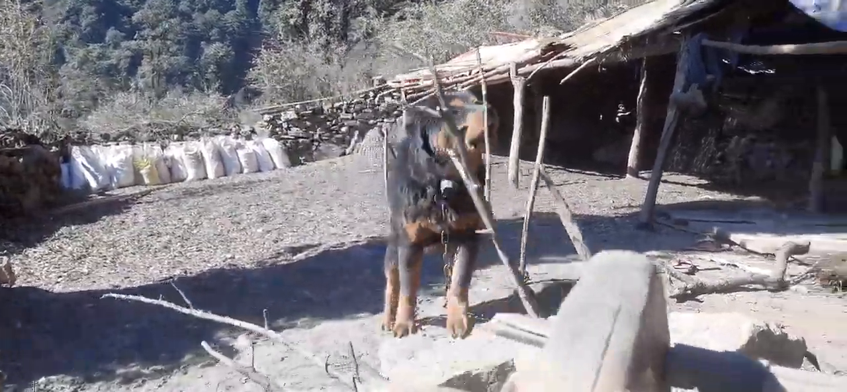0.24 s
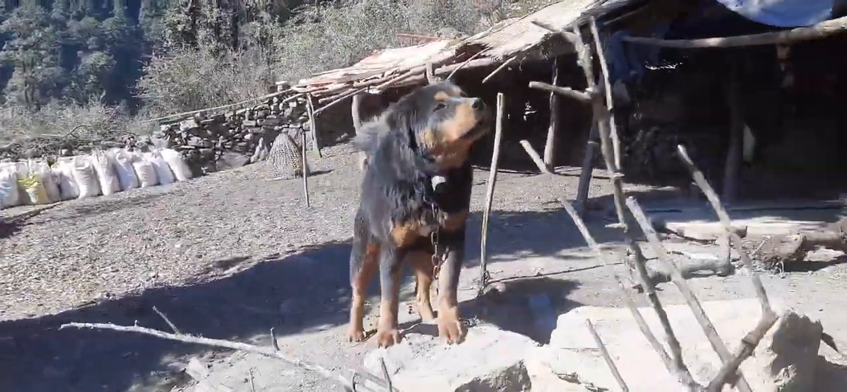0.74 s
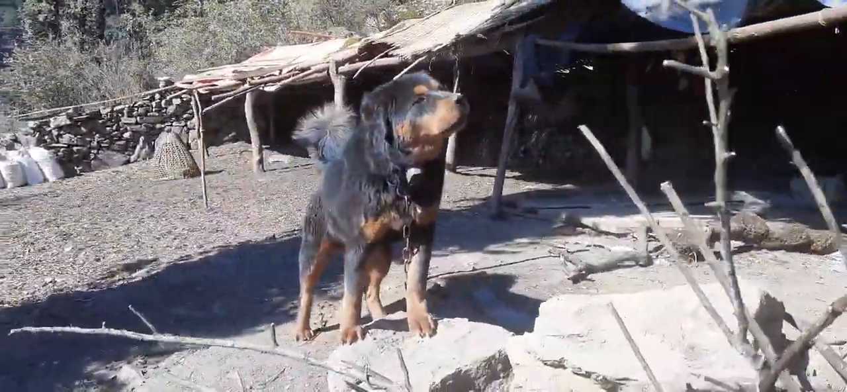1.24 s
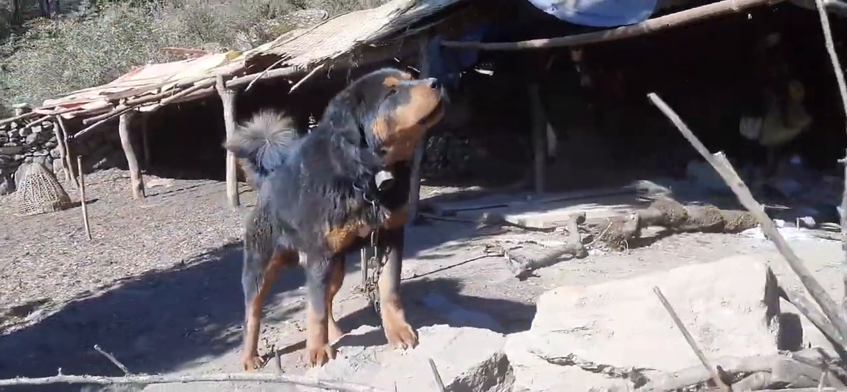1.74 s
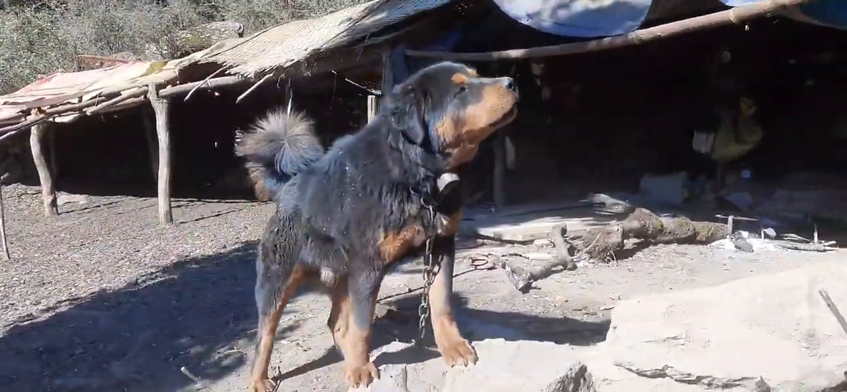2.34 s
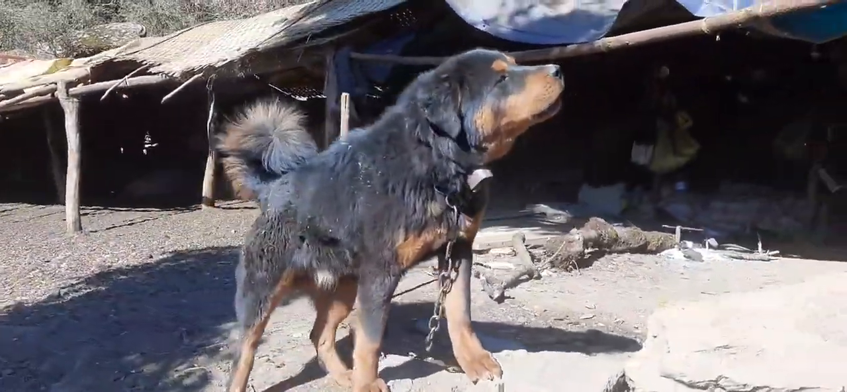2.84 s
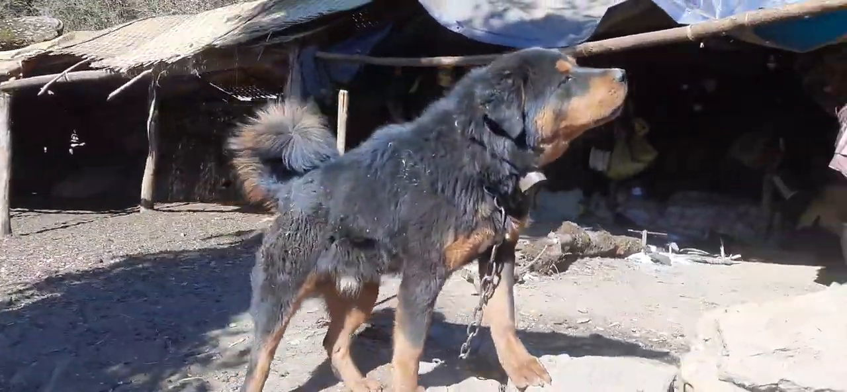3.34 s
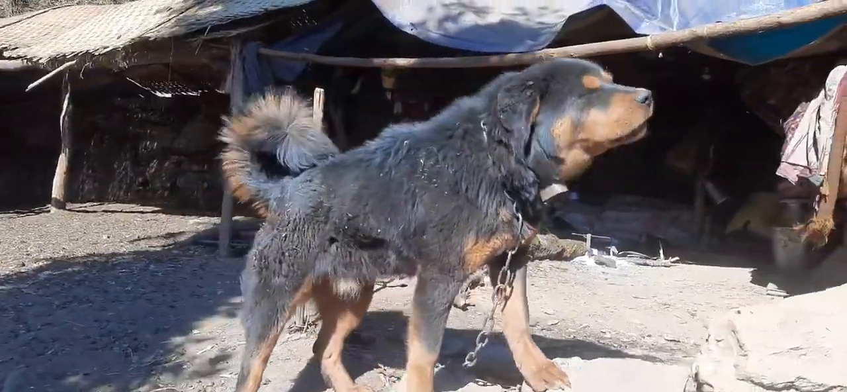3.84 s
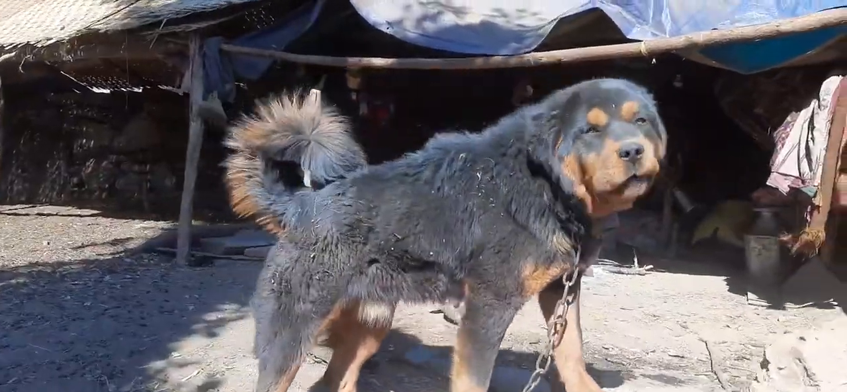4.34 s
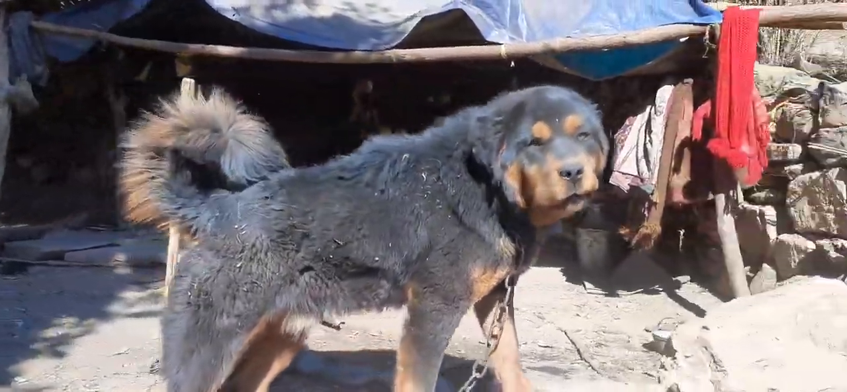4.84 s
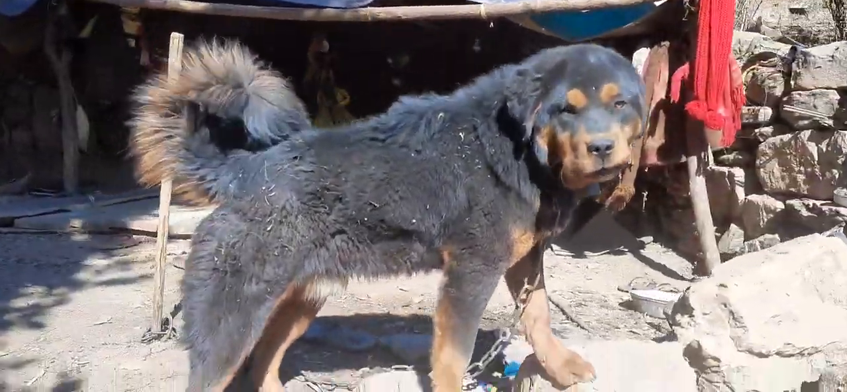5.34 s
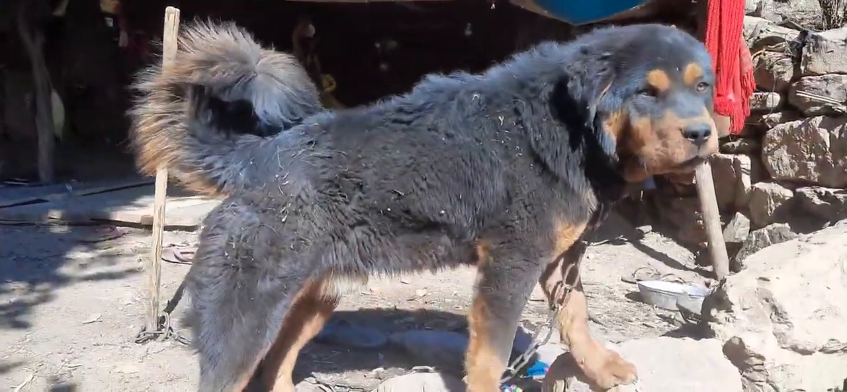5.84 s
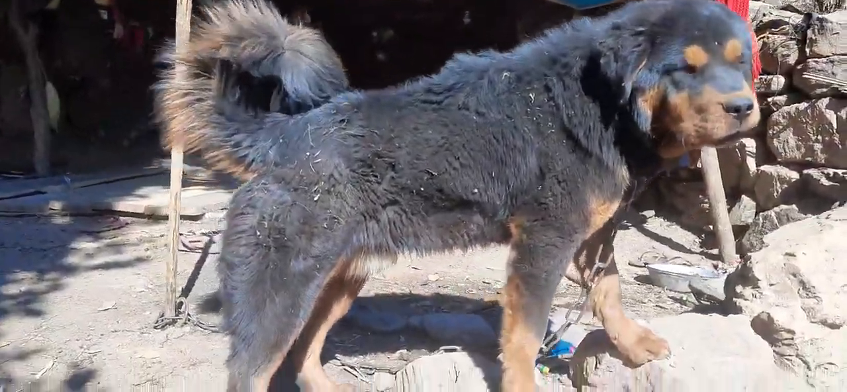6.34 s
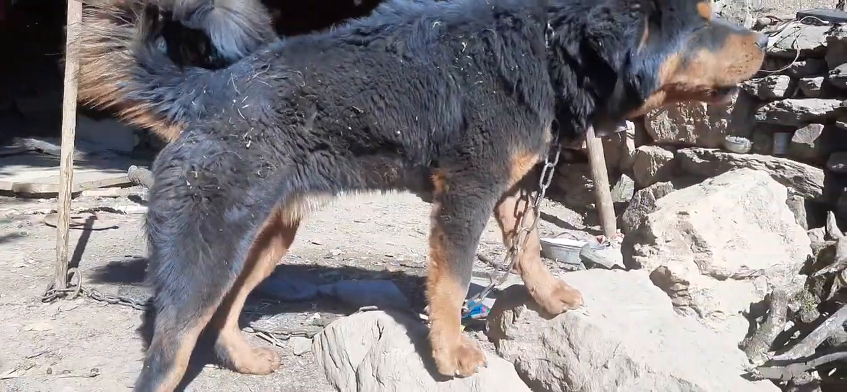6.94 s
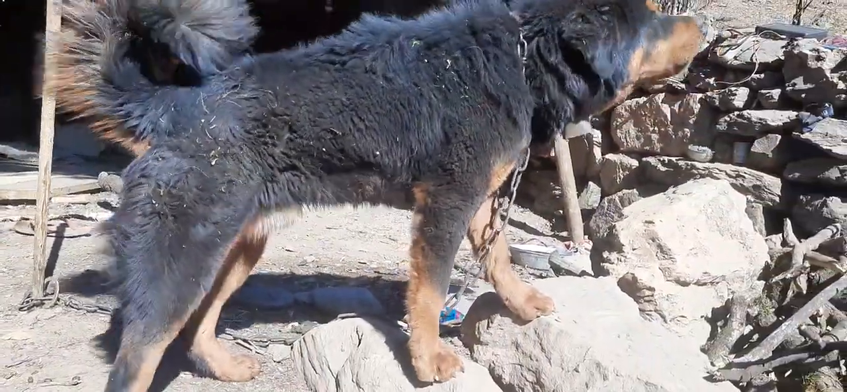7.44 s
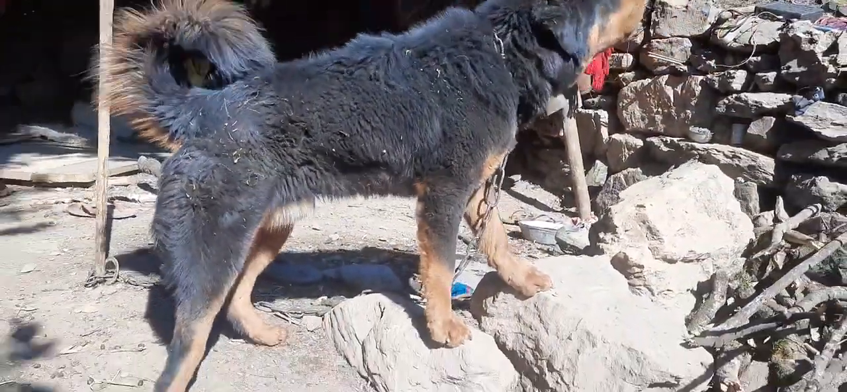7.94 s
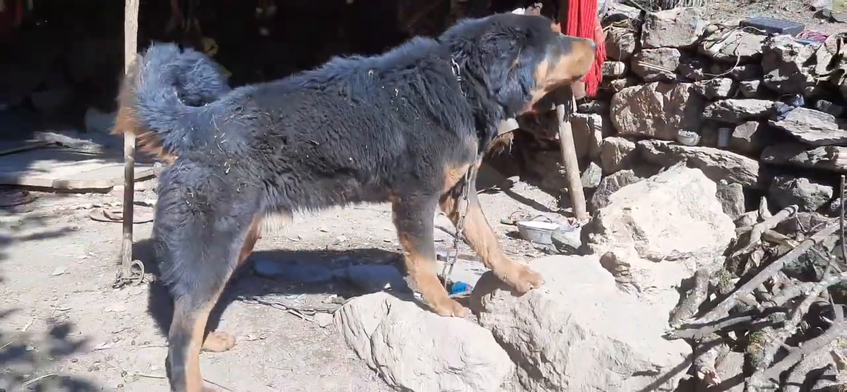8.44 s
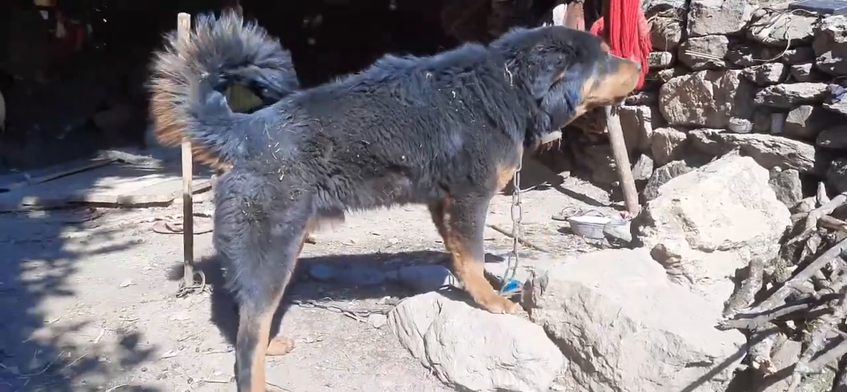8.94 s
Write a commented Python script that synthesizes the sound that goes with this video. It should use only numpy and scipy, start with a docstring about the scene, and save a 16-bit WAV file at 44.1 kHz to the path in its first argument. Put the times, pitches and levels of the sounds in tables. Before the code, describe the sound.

A big chained dog close by gives loud, hoarse, throaty barks, first a pair, then several spaced ones, some trailing into low creaky growls. Its small collar bell clinks with the movements. Between barks come soft panting and faint ticks of grit. A distant dog answers. Around the middle the barking stops and wind buffets the microphone in dull thumps, then a quick new run of barks follows. Open yard with short echoes off stone walls, stereo handheld microphone.

```python
"""A big chained dog barks in a mountain yard: each bark is a hoarse, throbbing pair of oscillators with two bands above,
and some end in slow creaky pulses that ring the throat. The collar bell and a piece of chain ring as decaying modes.
Shaped noise makes the panting, scuffs, ticks and wind on the two microphone ports; a short faint tone glides upward.
A second dog answers from afar in the same kind of voice, and walls echo the dogs and bell.
The background rustle rises with each bark and fades over a second or two."""
import sys
import numpy as np
from scipy import signal
from scipy.fft import rfft, irfft, next_fast_len
from scipy.io import wavfile
from scipy.ndimage import uniform_filter1d, minimum_filter1d, map_coordinates

SR = 44100
rng = np.random.default_rng(int(sys.argv[2]) if len(sys.argv) > 2 else 0)


def inscribe(sig):
    """Save sig as 16-bit PCM at rate SR to the path in sys.argv[1].

    A 1-D sig is mono; a 2-D sig holds one channel per row.
    Samples are clipped to [-1, 1] before scaling.
    """
    pcm = np.round(np.clip(np.atleast_2d(sig).T, -1, 1) * 32767)
    wavfile.write(sys.argv[1], SR, pcm.astype(np.int16))


N = 405719

# Table levels are relative; the functions add their own offsets, scatter and fluctuation.

# The near dog, one curve a bark: time_s, effort_db, pitch_hz, second_over_first_db, second_hz, sum_tone_over_first_db
BARK_CURVES = [
    [(0.0, -6.5, 418.5, -1.5, 729, -9.5), (0.028, -7, 410.6, -27, 721.1, -16.5),
     (0.058, -16, 404, -7, 699, -8.5), (0.086, -29, 405.7, -26, 681.7, -20),
     (0.13, -43, 406, -16.5, 755, -16)],
    [(0.325, -33, 410.6, -24, 819.2, -16.5), (0.333, -26, 411.6, -14, 823.4, -21),
     (0.355, -7, 414.9, -16.5, 811, -16.5), (0.403, -3.5, 399, -15, 742.1, -13.5),
     (0.449, -14.5, 399.4, -5, 722, -10), (0.481, -29.5, 390.1, -16, 737.5, -18.5),
     (0.53, -41, 386.1, -16, 762.3, -18)],
    [(1.54, -30, 393, -22, 776.6, -24), (1.564, -13.5, 393.6, -7.5, 815.3, -12.5),
     (1.586, -9, 398.8, -5.5, 802.8, -9), (1.616, -5.5, 407.7, -11, 795, -14.5),
     (1.656, -10.5, 405.2, -4, 820.3, -14), (1.682, -16, 398.2, -9, 832.8, -30.5),
     (1.706, -31, 393.6, -9, 840.2, -15.5), (1.76, -41.5, 420, -21, 815.5, -13)],
    [(1.93, -43, 393.3, -19, 807, -18.5), (1.958, -25.5, 397.1, -27, 805.9, -30),
     (1.976, -7, 400.9, -13, 789.1, -19), (2.024, -7.5, 417.6, -13, 764.1, -7),
     (2.064, -20.5, 416.3, -2.5, 714.7, -11), (2.084, -15, 408.2, -24.5, 688.6, -17),
     (2.14, -40.5, 413.6, 4, 822.8, -15), (2.182, -36, 406.2, -4.5, 762.5, -29),
     (2.2, -45, 396, -5, 789.6, -20.5)],
    [(2.555, -37.5, 409, -12, 837.5, -13.5), (2.573, -25, 410.8, -16.5, 836.5, -35),
     (2.593, -10, 415.7, -10, 801.9, -15.5), (2.637, -13.5, 423.5, -4, 734, -8.5),
     (2.657, -9, 431.7, -20, 758.3, -12), (2.685, -9, 428.9, -13, 812.8, -22),
     (2.703, -13.5, 429.4, -25, 791.3, -28), (2.735, -33, 433.9, -3.5, 724.5, -21),
     (2.775, -36.5, 412.4, -19, 743.4, -25), (2.79, -49, 407.7, -3, 763.7, -12)],
    [(3.55, -40.5, 418.1, -15, 813, -17.5), (3.576, -16, 424.3, -20, 819, -20),
     (3.596, -8, 435.3, -14, 835.5, -15), (3.63, -13, 432.3, -3, 807, -10),
     (3.658, -22, 430.1, 9, 752, 0.5), (3.696, -16, 442, -18.5, 732.6, -12),
     (3.77, -47.5, 430, -5.5, 736, -5.5)],
    [(6.885, -34, 425.7, -13, 883, -18.5), (6.911, -13.5, 434.5, -10.5, 872.4, -21),
     (6.935, -6, 445.4, -13.5, 861, -15.5), (6.965, -9.5, 451, -10.5, 791, -14),
     (6.997, -20, 434.6, 3.5, 747, -2.5), (7.047, -25.5, 436.1, -17, 751.2, -14.5),
     (7.11, -48.5, 451.8, -9, 1002, -1.5)],
    [(7.22, -28, 410.8, -25, 855, -29), (7.228, -23.5, 409.4, -12.5, 855.4, -15.5),
     (7.254, -10, 404.9, -11.5, 842.5, -12.5), (7.306, -10.5, 417.8, -2, 840.6, -7.5),
     (7.332, -19.5, 414.4, 2, 796.4, -6.5), (7.356, -16.5, 425, -8.5, 782.5, -12.5),
     (7.388, -24, 431.9, -22.5, 788.6, -22.5), (7.43, -55, 417.2, 2, 755, -8)],
    [(7.51, -50.5, 384, -6.5, 808, -3.5), (7.53, -28, 392.8, -15, 792.4, -20),
     (7.544, -13, 395.5, -9.5, 805.8, -21), (7.574, -6, 413.4, -10.5, 778.7, -13.5),
     (7.598, -11, 411.4, -1.5, 766.4, -5.5), (7.658, -14, 428.2, -12, 745, -16.5),
     (7.682, -16.5, 423.1, -23, 797.6, -35), (7.716, -36.5, 408.9, -15, 842.4, -30),
     (7.73, -38, 403.6, -21, 824, -14)],
    [(8.19, -35, 424.2, -16, 781, -29), (8.196, -39, 428.3, -20, 779, -20.5),
     (8.214, -9, 424.7, -11.5, 776.3, -20), (8.25, -10, 425, -11.5, 767.4, -9),
     (8.282, -12, 423.5, -2, 772, -14), (8.296, -13.5, 418.6, -2.5, 769.4, -10.5),
     (8.368, -27, 440.5, -31, 784, -22.5), (8.41, -47.5, 426.4, -25, 643.8, -10)],
    [(9.07, -32, 432, -18, 836.4, -14), (9.094, -14, 422.2, -10, 864, -11),
     (9.132, -8.5, 437, -5.5, 868, -10), (9.2, -25, 415.6, 5, 785, -5.5)],
]
# Click and fourth band, a row a bark: click_s, click_level_db, fourth_hz, fourth_over_first_db
MOUTH_OPENINGS = [(0.001, -68, 1950, -21), (0.33, -40.5, 1950, -22.5), (1.535, -25.5, 1942, -23.5),
                  (1.941, -42, 2000, -27), (2.549, -32, 1950, -30), (3.552, -32.5, 1950, -31.5),
                  (6.885, -16.5, 1800, -29), (7.202, -36, 1928, -21), (7.516, -35, 1904, -23),
                  (8.186, -34.5, 1953, -29), (9.067, -23.5, 1950, -22.5)]
# Breath in each bark: hiss_over_effort_db, narrow_rasp_hz, rasp_over_hiss_db
BREATH_RASPS = [(-15.5, 2400, -4.5), (-18.5, 2200, -3), (-16.5, 2350, -7.5), (-19, 2200, 2),
                (-17.5, 2700, -3.5), (-15, 3100, -1.5), (-17.5, 2680, -1.5), (-23.5, 2300, 2.5),
                (-20.5, 1900, 3.5), (-20.5, 2100, 5.5), (-17.5, 2350, -4.5)]
# Instants at which the low voice chokes: middle_s
CHOKE_TIMES = [0.054, .374, 1.593, 1.613, 1.635, 1.664, 1.997, 2.075, 2.623, 2.644, 3.61, 3.642, 3.68,
               6.918, 6.952, 6.987, 7.033, 7.284, 7.328, 7.562, 7.639, 8.217, 8.277, 9.099, 9.167]
# Throat resonances: centre_hz, width_hz of a single pass
THROAT_RESONANCES = [(415, 200), (800, 300), (1250, 380), (1920, 230)]
# Spectrum of the breath in a bark: frequency_hz, density_db (per Hz)
BREATH_SPECTRUM = [(1900, -24.5), (2350, 9), (2650, -3.5), (2950, -6.5), (3400, -2), (4100, -3),
                   (4900, -5.5), (5700, -7), (8000, -16), (12000, -20.5), (16000, -20)]
# Single creaky pulses after a bark, often in twins: start_s, level_db
CREAK_PULSES = [(.539, -37.5), (.587, -40), (.648, -47), (.734, -35), (.779, -39), (.8, -38), (.855, -44),
                (0.877, -44), (.935, -42), (1.799, -35), (1.819, -37), (1.858, -41), (1.873, -42),
                (1.901, -33), (2.808, -33), (2.826, -33.5), (2.862, -36.5), (2.916, -33.5), (2.958, -31),
                (2.999, -32.5), (3.013, -30.5), (3.031, -39), (3.066, -36), (3.085, -35.5), (3.141, -41.5),
                (3.162, -41), (3.218, -45), (3.243, -47), (7.094, -36), (7.15, -40), (7.166, -37)]
# Strength of each throat resonance in a creak: level_db
CREAK_RESONANCE_DB = [9, -11, -14, -24]
# The near dog's bearing: time_s, left_over_right_db, left_lag_ms
DOG_BEARING = [(0, -1.5, 0.012), (4, -3.5, 0.035), (6.8, -3.5, 0.13), (9.2, -2, 0.11)]
# Decay of the wall echoes: frequency_hz, t60_s
WALL_DECAY = [(300, 0.13), (1500, 0.039), (6000, 0.024)]

# Gusts: time_s, level_db, left_over_right_db
WIND_CURVE = [(0.0, -37, 0), (0.05, -62, 3.5), (3.25, -61, -0.5), (3.41, -83.5, 11.5), (3.71, -45.5, -4),
              (3.94, -70.5, -28), (4.46, -75.5, 12), (4.48, -68.5, -36.5), (4.82, -53.5, -33),
              (4.92, -43, -10.5), (5.33, -65.5, 13.5), (5.48, -30.5, -49), (5.56, -61, -12.5),
              (5.71, -49, -9), (6.2, -39.5, 0), (6.28, -42, 0.5), (6.51, -26, -20), (6.61, -30.5, -3),
              (6.66, -18.5, -27), (6.69, -45.5, 10), (6.82, -46, 25), (6.94, -42, 6), (7.66, -57.5, -3),
              (8.02, -51.5, 39), (8.07, -42, 3.5), (9.2, -37.5, 2.5)]
# Strongest eddies: start_s, level_db, left_over_right_db
EDDY_THUMPS = [(4.489, -48, -25.5), (4.641, -49, -35), (4.767, -41, -27), (4.984, -31.5, 8),
               (5.164, -42.5, 16.5), (5.418, -36, -24), (5.472, -34, -50), (5.674, -28, -15),
               (5.783, -43.5, -29), (5.882, -32.5, -12), (6.071, -28, -20), (6.198, -19, -8.5),
               (6.345, -16.5, -13.5), (6.46, -23, -17), (6.474, -19.5, -19), (6.497, -18.5, -30),
               (6.548, -16.5, -7), (6.556, -23.5, -30), (6.578, -15, -10.5), (6.652, -14, -23),
               (6.694, -30, -7.5), (8.071, -30.5, 12), (8.533, -19.5, 0), (8.887, -20.5, 21)]
# Spectrum of wind buffeting, also of the rumble under a bark: frequency_hz, density_db (per Hz)
BUFFET_SPECTRUM = [(20, -26), (45, -4), (100, 2), (200, -11.5), (400, -26.5), (900, -51.5), (2000, -86)]
# Spectrum of the sharper edge of strong gusts: frequency_hz, density_db (per Hz)
FLUTTER_SPECTRUM = [(100, -29.5), (220, 13), (450, -3.5), (900, -35), (2000, -65)]
# Spectrum of the yard's rustle: frequency_hz, density_db (per Hz)
RUSTLE_SPECTRUM = [(150, -12), (300, -4.5), (420, 0), (600, -10.5), (1000, -9.5), (2000, -26.5),
                   (3500, -30.5), (16000, -40.5)]

# Clapper blows: start_s, bright_level_db, low_over_bright_db, high_over_bright_db
CLAPPER_BLOWS = [(0.1755, -50, 11, 4), (0.2342, -34, 1, 2.5), (0.5554, -59.5, 19, 12.5),
                 (0.6032, -36.5, 4, -2), (0.6867, -43.5, 2.5, -4), (0.768, -62, 6, -6),
                 (0.818, -48.5, 2.5, 0), (0.84, -52, -4, -7), (0.8598, -43.5, 0, -9),
                 (0.9087, -49.5, 4.5, -3.5), (0.99, -58.5, -2.5, -3), (1.7788, -45, 4, 5),
                 (1.8145, -37, -4.5, -7), (1.8705, -44, -2.5, -5), (2.0075, -35, 4, -10),
                 (2.144, -41, -19, -8.5), (2.7861, -36.5, 0.5, -4), (2.84, -36.5, -10.5, -8),
                 (2.9324, -47, -7.5, -16.5), (3.8061, -30, -2, -10), (3.8659, -33.5, -19, -13),
                 (3.9111, -46, -6.5, -5), (4.0498, -47, -2, -16), (4.3052, -60.5, 17, 21.5),
                 (6.9513, -47.5, 8.5, -21.5), (7.229, -29, -1.5, -10.5), (7.4505, -45, 12, 1.5),
                 (7.539, -31, -5.5, -8), (7.558, -35.5, -7.5, -4), (7.8361, -33, 1, -15),
                 (7.9882, -48.5, 4, -12.5), (8.127, -58, 8, -2), (8.4599, -31.5, 6.5, -8),
                 (8.53, -47.5, 14.5, -9.5), (8.5936, -51, 14, -14), (8.7653, -64.5, 22, -9),
                 (8.818, -56, 15, -6.5), (8.9518, -50.5, 8.5, -10), (9.1169, -37, 1, -6.5)]
# Bell modes in the groups low, middle, bright, high, top: frequency_hz, level_in_group_db, nominal t60_s
BELL_MODES = [
    [(1137, 0, .5)],
    [(2223, -5, .6), (2699, 0, .45)],
    [(3798, 0, .33), (3812, -11, .25), (4554, -22, .5)],
    [(5943, -5, .28), (6316, -4, .18), (6721, -6, .22), (7300, -11, .22)],
    [(8264, -7, .09), (8931, -11, .06), (9663, -9, .06), (10854, -5, .07), (11768, -5, .08),
     (12540, -8, .05), (13580, -6, .06), (14700, -7, .05), (15540, -8, .05)],
]
# Panting puffs: middle_s, half_length_s, level_db
PANT_PUFFS = [(0.75, 0.19, -57.5), (0.951, 0.14, -63), (3.003, 0.042, -50.5), (3.224, 0.045, -52),
              (3.431, 0.043, -49.5), (3.829, .05, -49.5), (4.017, 0.063, -58.5), (4.247, .045, -56.5),
              (4.469, 0.049, -53.5), (8.747, 0.055, -67)]
# Spectrum of the puffs: frequency_hz, density_db (per Hz)
PUFF_SPECTRUM = [(880, -59), (1500, -16.5), (2580, 2.5), (2990, -9), (3240, -1), (5680, -2.5), (9290, -16),
                 (15800, -20)]
# Ticks of twigs and grit: start_s, level_db
GRIT_TICKS = [(1.044, -31), (2.259, -46), (2.315, -39), (3.354, -45.5), (3.449, -54), (4.671, -50),
              (4.762, -42.5), (4.782, -40.5), (4.82, -44.5), (4.861, -42.5), (4.925, -45.5), (4.948, -48.5),
              (5.711, -41), (6.477, -47), (8.721, -31), (8.751, -33)]
# Spectrum of ticks and scuffs: frequency_hz, density_db (per Hz)
GRIT_SPECTRUM = [(150, -18), (500, -6), (1500, 1), (3000, -18.5), (8000, -27)]
# The far dog, one curve a bark: time_s, level_db, pitch_hz, second_over_first_db, second_hz, sum_tone_over_first_db
ANSWER_CURVES = [
    [(1.29, -69.5, 390.7, -31, 912, -49.5), (1.336, -31.5, 435.8, -14, 929, -23.5),
     (1.4, -40.5, 431, 3.5, 894, -6), (1.436, -36, 393, -20, 773.3, -20), (1.5, -70, 395, 1, 888, 0)],
    [(2.32, -56.5, 407, -3.5, 815.6, -15.5), (2.364, -29, 430.3, -13.5, 854, -21.5),
     (2.436, -40, 430.1, 11, 729.6, -9.5), (2.484, -45, 387, -14, 733.6, -39),
     (2.53, -63, 389, -17, 762.4, -16)],
    [(5.04, -69, 436, -2.5, 790, -20), (5.082, -73, 430.5, 0.5, 789, -7), (5.166, -67.5, 480, -1, 850, -2),
     (5.262, -72, 470, -4, 800, -5.5), (5.3, -86, 386.7, 4.5, 767, -11)],
    [(5.6, -64, 419.7, -3.5, 829, -4.5), (5.628, -55, 402.6, -12.5, 814, -14.5),
     (5.642, -52, 397.2, -4.5, 818, -12.5), (5.69, -75, 381, -19, 810, -6)],
    [(5.86, -67, 391, -11, 749, -25), (5.872, -87, 413, -6, 751, -9), (5.926, -41.5, 434.8, -18, 736, -27),
     (5.96, -48.5, 437, -7, 789, -7.5), (6.18, -66.5, 410, -11.5, 739, -10)],
    [(7.75, -49, 436.5, -18, 899, -3), (7.796, -29.5, 438.4, -5, 890, -18),
     (7.82, -27, 441.6, -3, 898, -20), (7.852, -44.5, 441, 12, 853, -7), (7.92, -59, 395.5, 0.5, 787, -11)],
]
# Fourth band of each far bark: fourth_hz, fourth_over_sum_tone_db
ANSWER_FOURTH_BANDS = [(2270, -13.5), (2740, -10.5), (2176, -10.5), (2005, -5), (1970, -7), (2660, -7.5)]
# Modes of the ringing piece of chain: frequency_hz, level_db, t60_s
LINK_MODES = [(906, -68, 2), (2223, -52.5, 0.56), (2710, -66, 1.1), (4430, -70.5, 1.4), (6380, -43.5, 0.19)]
# Dry rustles: middle_s, half_length_s, level_db
GROUND_SCUFFS = [(4.8, 0.084, -64.5), (4.94, 0.058, -70), (5.5, 0.081, -59.5), (6.0, 0.14, -59),
                 (6.32, 0.039, -67.5), (6.49, 0.029, -63), (6.65, 0.066, -61.5)]
# A faint rising tone: time_s, frequency_hz, level_db
WHINE_GLIDE = [(8.9, 1430, -90), (8.925, 1580, -57), (8.95, 1970, -64), (8.97, 2150, -100)]

THROB_DB, THROBS_PER_S = 1.8, 70  # the voice swells and chokes unevenly; knots a second
FADING_DB, FADING_GAIN = 4.5, .07  # extra throb once the effort sinks under this gain
CHOKE_S = .0028  # half length
FOURTH_FOLLOWS = 0.9  # dB the fourth band gains per dB of the sum tone
CHEST_DB = -39
STILL_DB, RISE_DB, RISE_T60_S = -70, -37, 1.56  # rustle of the quiet yard; its rise with each bark and the fade
MIDDLE_DB, TOP_DB = -22, -1.5  # middle modes against the stronger of low and bright; top modes against the high ones
STRIKE_DB, STRIKE_T60_S = -10, 0.05  # all but the low mode start stronger, until the fur damps them
WAVER_DB = 3.2  # the ring's level wavers quickly and irregularly
LINK_S = 4.305
TOP_HZ = 15970


def amp(db):
    """Level to amplitude ratio: 20 dB for each factor of ten."""
    return 10 ** (np.asarray(db) / 20)


def unit(x):
    """Normalisation to unit root mean square."""
    return x / np.sqrt(np.mean(x ** 2, axis=-1, keepdims=True) + 1e-20)


def along(points, hz):
    """Interpolation of (Hz, value) points on a logarithmic frequency axis."""
    f, v = np.transpose(points)
    return np.interp(np.log(hz + 1), np.log(f + 1), v)


def curves(rows):
    """Linear interpolation in time: one value per sample for each column after the time."""
    s, *cols = np.transpose(rows)
    return [np.interp(np.arange(N) / SR, s, c) for c in cols]


def wobble(rate):
    """Band-limited fluctuation: a smooth random curve with rate knots a second."""
    n = np.arange(0, N + 8, 8)
    knots = rng.standard_normal(int(N * rate / SR) + 4)
    return np.interp(np.arange(N), n, map_coordinates(knots, [n * rate / SR]))


def filtered(x, response):
    """Linear filtering: the spectrum of x times a complex response of frequency."""
    m = next_fast_len(N + SR // 2)
    return irfft(rfft(x, m) * response(np.fft.rfftfreq(m, 1 / SR)), m)[..., :N]


def resonance(hz, width_hz):
    """Damped resonator passed twice, for steeper skirts."""
    return lambda f: (1j * f * width_hz / (hz * hz - f * f + 1j * f * width_hz)) ** 2


def noise(spectrum, channels=1):
    """Coloured noise of unit rms: white noise weighted by a spectrum."""
    return unit(filtered(rng.standard_normal((channels, N)), lambda hz: amp(along(spectrum, hz))))


def patchy(x, depth_db):
    """Time-frequency modulation: random patches of gain."""
    z = signal.stft(x, nperseg=256)[2]
    field = uniform_filter1d(rng.standard_normal(z.shape), size=2, axis=0)
    field = uniform_filter1d(field, size=14, axis=1)
    return unit(signal.istft(z * amp(depth_db * field / field.std()), nperseg=256)[1][:N])


def puffs(rows):
    """Gaussian envelopes: soft swells from (middle s, half length s, dB) rows."""
    t = np.arange(N) / SR
    return sum(amp(db) * np.exp(-2 * ((t - s) / half) ** 2) for s, half, db in rows)


def during(calls):
    """Gating: 1 while a call lasts, with soft ends."""
    on = np.zeros(N)
    for call in calls:
        on[round(call[0][0] * SR):round(call[-1][0] * SR)] = 1
    return uniform_filter1d(on, size=300)


def voice(pitch_hz, second_hz, fourth_hz, gains, jitter, halving, rasps, chop_db):
    """Combination tones: two unsteady oscillators, their sum and a high throat band, each with its share of rough air."""
    def cycle(hz):
        return 2 * np.pi * np.cumsum(hz * (1 + jitter * wobble(100))) / SR

    phase = cycle(pitch_hz * amp(5 * jitter * wobble(30)))
    slide, high = cycle(second_hz), cycle(fourth_hz)
    # strong and weak pulses alternate at times
    uneven = 1 + halving * np.clip(1 + wobble(25), 0, 2) * np.cos(phase / 2)
    opening = uneven * np.exp(14 * (np.cos(phase) - 1))
    breath = (0.63 + opening) * rng.standard_normal(N)
    layers = [unit(filtered(np.array([opening, breath]), resonance(*THROAT_RESONANCES[0])))]
    for angle, width_hz in [(slide, 450), (phase + slide, 600), (high, 500)]:
        rough = wobble(width_hz) * np.sin(angle) + wobble(width_hz) * np.cos(angle)
        layers.append(unit(np.array([np.sin(angle), rough])))
    out = np.zeros(N)
    for (clear, rough), gain, rasp in zip(layers, gains, rasps):
        flapping = amp(chop_db * rasp * wobble(60))  # loose tissue flaps unevenly
        out += gain * unit(flapping * (clear + rasp * rough))
    return filtered(out, lambda f: 1 / (1 + (260 / (f + 1)) ** 6))  # the mouth radiates no deep bass


def effort():
    """Vocal drive: how hard the near dog pushes, as a gain."""
    return during(BARK_CURVES) * amp(curves(np.concatenate(BARK_CURVES))[0])


def chokes():
    """Interrupted oscillation: the low voice falls silent at each choke and restarts with opposite sign."""
    t = np.arange(N) / SR
    return np.prod([np.tanh((t - s) / CHOKE_S) for s in CHOKE_TIMES], axis=0)


def barks():
    """Amplitude coupling: the upper bands follow the effort, partly throb by throb; the hiss goes with the highest."""
    _, pitch_hz, open_db, second_hz, third_db = curves(np.concatenate(BARK_CURVES))
    held = [(call[end][0], *mouth[2:], *rasp)
            for call, mouth, rasp in zip(BARK_CURVES, MOUTH_OPENINGS, BREATH_RASPS) for end in (0, -1)]
    fourth_hz, bright_db, hiss_db, rasp_hz, rasp_db = curves(held)
    fourth_db = bright_db + FOURTH_FOLLOWS * (third_db + 13.5)
    steady = effort()
    throb_db = THROB_DB + FADING_DB / (1 + (steady / FADING_GAIN) ** 2)
    first = steady * chokes() * amp(throb_db * wobble(THROBS_PER_S))
    gains = [first, *amp([open_db, third_db, fourth_db]) * (np.abs(first) + steady) / 2]
    hoarse = voice(pitch_hz, second_hz, fourth_hz, gains, jitter=.03, halving=.45,
                   rasps=[.36, .52, .85, 1], chop_db=3.5)
    hiss = patchy(noise(BREATH_SPECTRUM)[0], depth_db=6.5)
    rasp = unit(wobble(800) * np.sin(2 * np.pi * np.cumsum(rasp_hz) / SR))
    breath_gain = amp(0.54 * fourth_db + .25 * open_db + hiss_db) * steady ** 0.91
    return hoarse + breath_gain * (hiss + amp(rasp_db) * rasp)


def creaks():
    """Impulse response of the throat: one pulse opens each bark, slow trains follow some."""
    blows = np.zeros(N)
    s, db = np.transpose([row[:2] for row in MOUTH_OPENINGS] + CREAK_PULSES)
    blows[(s * SR).astype(int)] = amp(db + 36.5)  # a narrow resonance passes little of an impulse

    def throat(f):
        return sum(amp(level_db) * resonance(hz, .5 * width_hz)(f)
                   for (hz, width_hz), level_db in zip(THROAT_RESONANCES, CREAK_RESONANCE_DB))
    return filtered(blows, throat)


def placed(x):
    """Level and time differences: the nearer port hears the dog louder and earlier."""
    pan_db, lag_ms = curves(DOG_BEARING)
    n, shift = np.arange(N), lag_ms * SR / 2000  # half the lag each way
    left = amp(pan_db / 2) * map_coordinates(x, [n - shift])
    right = amp(-pan_db / 2) * map_coordinates(x, [n + shift])
    return np.array([left, right])


def chest():
    """Low-frequency noise under each bark: the dull rumble it shakes loose, independent on the two ports."""
    return amp(CHEST_DB) * uniform_filter1d(effort(), size=2000) * noise(BUFFET_SPECTRUM, channels=2)


def walls(x):
    """Diffuse reverberation: shed and stone wall answer, each frequency dying at its own speed."""
    hz, t, z = signal.stft(rng.standard_normal((2, SR // 2)), SR, nperseg=256)
    decay = amp(-60 * t / along(WALL_DECAY, hz)[:, None])
    tail = signal.istft(z * decay, SR, nperseg=256)[1]
    delayed = np.pad(x, (300, 0))[None]
    return signal.fftconvolve(delayed, tail / np.linalg.norm(tail[0]), axes=1)[:, :N]


def wind():
    """Turbulent pressure: eddies differ by port, strong gusts grow a brighter edge, the strongest land as thumps."""
    db, pan_db = curves(WIND_CURVE)
    split_db = -10 * np.log10(1 + amp(2 * np.array([-pan_db, pan_db])))  # each port's share of the power
    port_db = db + split_db + 5.5 + 5.7 * np.array([wobble(35), wobble(39)])
    edge = noise(FLUTTER_SPECTRUM, channels=2)
    out = amp(port_db) * noise(BUFFET_SPECTRUM, channels=2) + amp(1.2 * port_db - 12) * edge
    t = np.arange(2000) / SR
    for s, peak_db, side_db in EDDY_THUMPS:
        push_hz = 105 * amp(rng.normal(0, 2.13, (2, 1)))
        push = np.sin(2 * np.pi * push_hz * t) * np.exp(-((t - .014) / 0.0051) ** 2) * amp(-1.5)
        crackle = edge[:, round(s * SR):][:, :len(t)]
        push += amp(-16) * np.exp(-((t - .012) / 0.00606) ** 2) * crackle
        sides_db = np.array([[side_db / 2], [-side_db / 2]])
        out[:, round(s * SR) - 300:][:, :len(t)] += amp(peak_db + sides_db) * push
    return out


def yard():
    """Leaky energy integration: a patchy, partly shared rustle rises with each bark and fades, over microphone hiss."""
    mid, side = noise(RUSTLE_SPECTRUM, channels=2) * amp(3 * wobble(36) + 2.5 * wobble(3))
    hiss = amp(-82) * rng.standard_normal((2, N))
    keep = amp(-2 * 60 / RISE_T60_S / SR)  # energy kept from one sample to the next
    lingering = signal.lfilter([10 / SR], [1, -keep], effort() ** 2)
    level = np.sqrt(amp(2 * STILL_DB) + amp(2 * RISE_DB) * lingering)
    return level * np.array([mid + 0.26 * side, mid - 1.5 * side]) + hiss


def bell():
    """Modal synthesis: each blow stops the old ring and starts a new one, soft blows more gently; modes beam unalike."""
    out = np.zeros((2, N + SR))
    ends = [row[0] for row in CLAPPER_BLOWS[1:]] + [N / SR]
    for (s, db, low, high), end in zip(CLAPPER_BLOWS, ends):
        middle, top = max(low, 0) + MIDDLE_DB, high + TOP_DB
        t = np.arange(int(min(end - s + 0.0043, .6) * SR)) / SR
        strike = amp(STRIKE_DB - 60 * t / STRIKE_T60_S)
        # a short burst of bright noise at the contact
        ring = amp(top - 0.5 - 60 * t / 0.042) * np.diff(rng.standard_normal((2, len(t) + 1)))
        groups = zip(BELL_MODES, [low, middle, 0, high, top], [1, 4, 2, 4.5, 4.5])
        for index, (modes, group_db, scatter_db) in enumerate(groups):
            boost = 1 + (index > 0) * strike
            for hz, mode_db, t60 in modes:
                turn = rng.uniform(0, 2 * np.pi) + rng.normal(0, hz / 5000, (2, 1))
                beam = rng.normal() + .5 * rng.normal(size=(2, 1))
                level_db = group_db + mode_db + scatter_db * beam
                mode_t60 = t60 * amp(.5 * scatter_db * rng.normal())
                ring = ring + amp(level_db - 60 * t / mode_t60) * np.sin(2 * np.pi * hz * t + turn) * boost
        attack_s = .001 * amp((-30 - db) / 2.5)
        edge = np.clip(np.minimum(t / attack_s, (t[-1] - t) / .003), 0, 1)
        out[:, round(s * SR):][:, :len(t)] += amp(db) * ring * edge
    return out[:, :N] * amp([[-1], [1]] + WAVER_DB * wobble(30))


def pants():
    """Turbulent breath: soft puffs of air through the open mouth."""
    return puffs(PANT_PUFFS) * noise(PUFF_SPECTRUM, channels=2)


def ticks():
    """Transient noise: short dry bursts of twigs and grit with exponential decay."""
    shape, t = np.zeros(N), np.arange(2000) / SR
    for s, db in GRIT_TICKS:
        shape[round(s * SR):][:len(t)] += amp(db - 5.0 - 60 * t / 0.017) * np.minimum(t / 0.006, 1)
    return shape * noise(GRIT_SPECTRUM)


def answers():
    """The same coupled oscillators for the far dog: gliding barks."""
    first_db, pitch_hz, second_db, second_hz, third_db = curves(np.concatenate(ANSWER_CURVES))
    held = [(call[end][0], *high) for call, high in zip(ANSWER_CURVES, ANSWER_FOURTH_BANDS) for end in (0, -1)]
    fourth_hz, fourth_db = curves(held)
    gains = amp(first_db + 2.5 + [0 * first_db, second_db, third_db, third_db + fourth_db])
    far = voice(pitch_hz, second_hz, fourth_hz, gains, jitter=.025, halving=.3,
                rasps=[.5, .55, 1, 1.5], chop_db=4)
    return during(ANSWER_CURVES) * far


def link():
    """Free vibration: a piece of the chain rings once, its thin steel modes dying slowly."""
    t = np.clip(np.arange(N) / SR - LINK_S, 0, None)  # the sines stay at zero until the ring starts
    return sum(amp(db - 60 * t / t60) * np.sin(2 * np.pi * hz * t) for hz, db, t60 in LINK_MODES)


def scuffs():
    """Friction noise: grainy rustle of dry ground."""
    return puffs(GROUND_SCUFFS) * amp(1.5 * wobble(80)) * noise(GRIT_SPECTRUM, channels=2)


def whine():
    """Frequency modulation: one short upward glide of a pure tone."""
    hz, db = curves(WHINE_GLIDE)
    return during([WHINE_GLIDE]) * amp(db) * np.sin(2 * np.pi * np.cumsum(hz) / SR)


def scene():
    """Superposition: direct sounds, wall echoes of the dogs and bell, wind and yard add linearly."""
    dog = barks() + creaks()
    other = answers()
    clinks = bell() + link()
    echoes = walls(amp(-20) * (dog + clinks[0]) + amp(-6) * other)
    near = placed(dog) + chest() + clinks + pants() + ticks() + scuffs() + whine()
    return near + 0.46 * other + echoes + wind() + yard()


def record(dry):
    """Peak limiting to full scale, then band limiting: reduced deep bass and nothing from TOP_HZ up."""
    needed = 1 / np.maximum(np.abs(dry).max(0), 1)
    gain = uniform_filter1d(minimum_filter1d(needed, size=600), size=300)
    return filtered(dry * gain, lambda hz: (hz < TOP_HZ) * hz ** 2 / (hz ** 2 + 30 ** 2))


dry = scene()
out = record(dry)
inscribe(out)
```